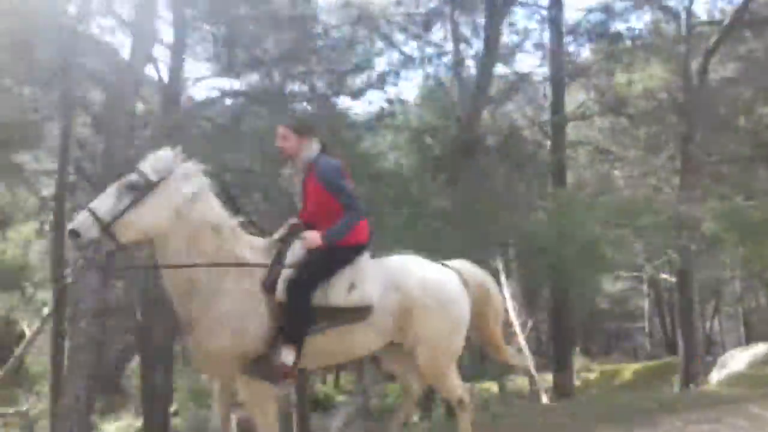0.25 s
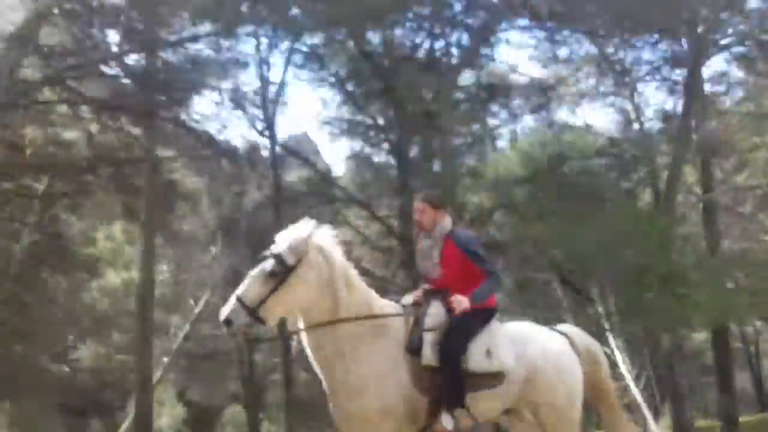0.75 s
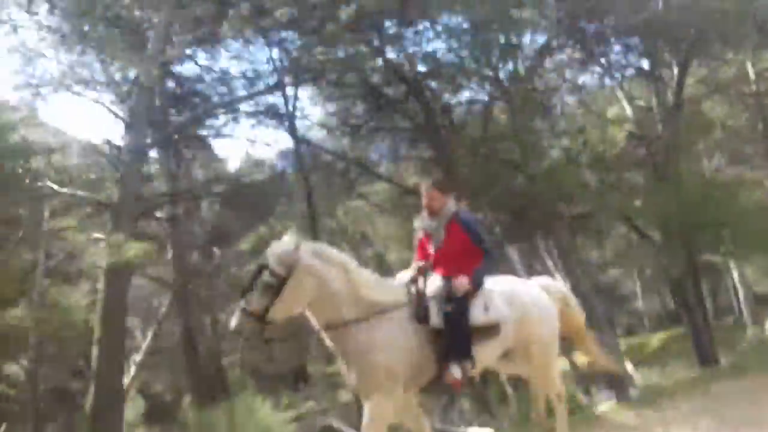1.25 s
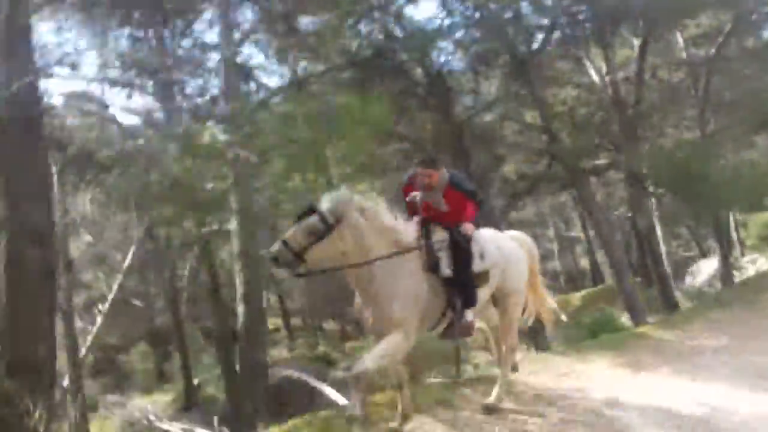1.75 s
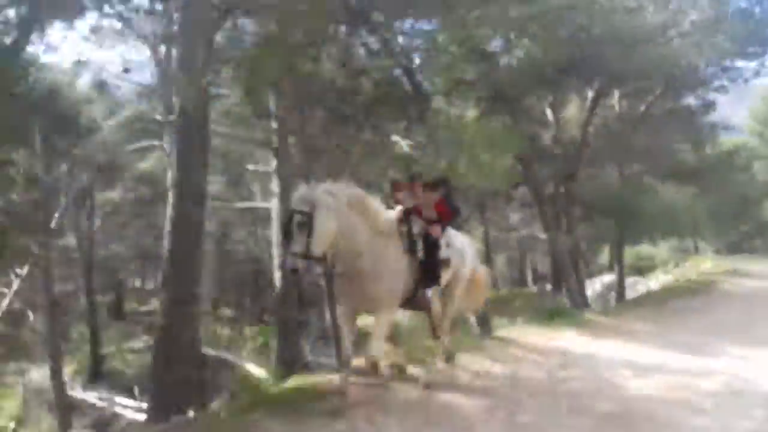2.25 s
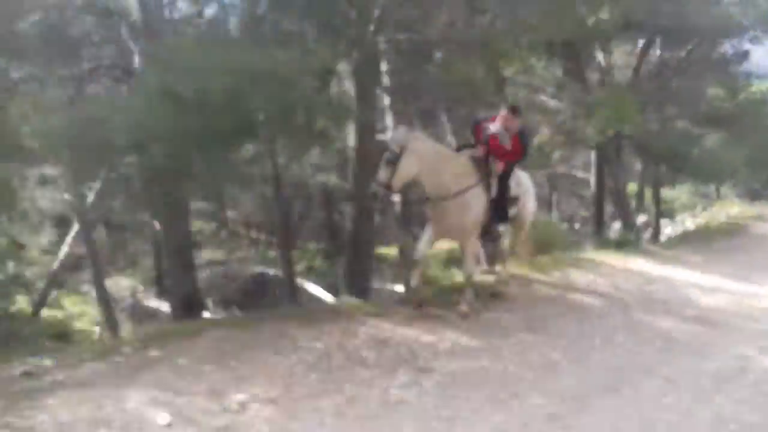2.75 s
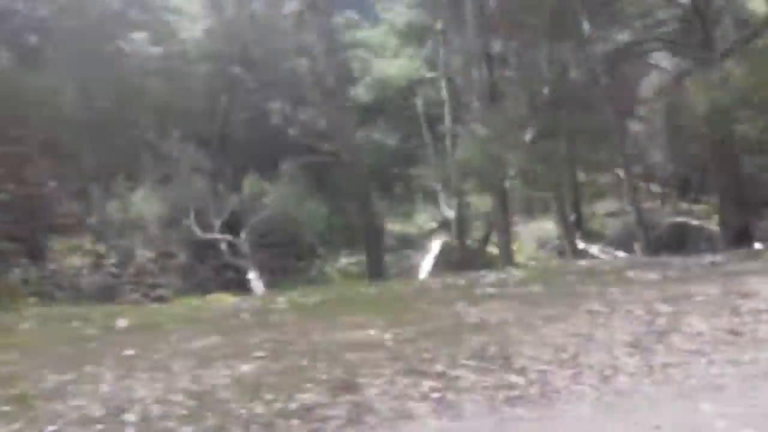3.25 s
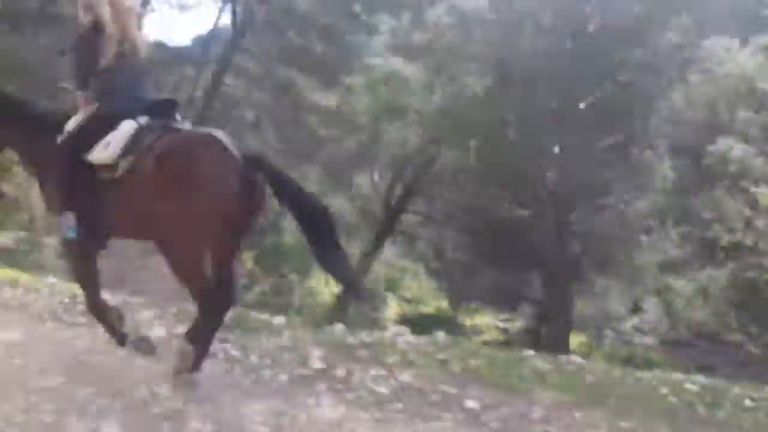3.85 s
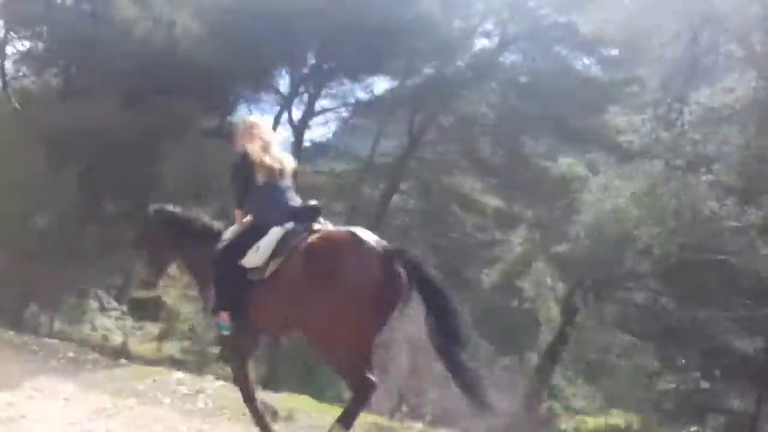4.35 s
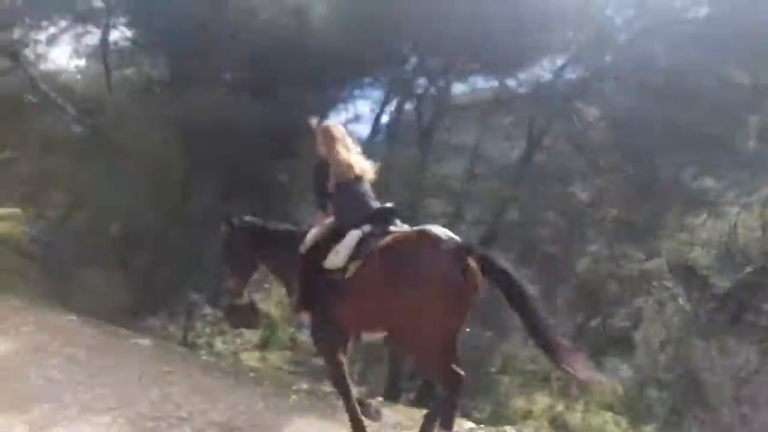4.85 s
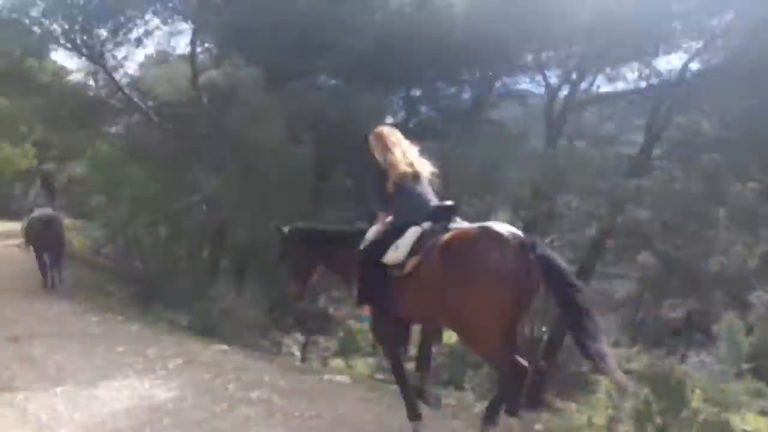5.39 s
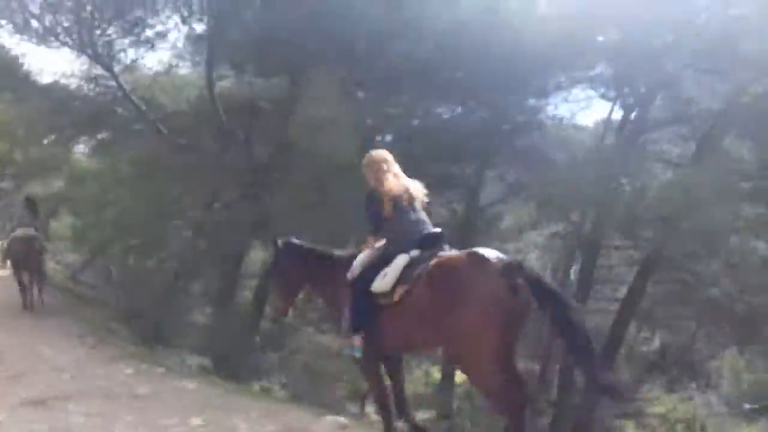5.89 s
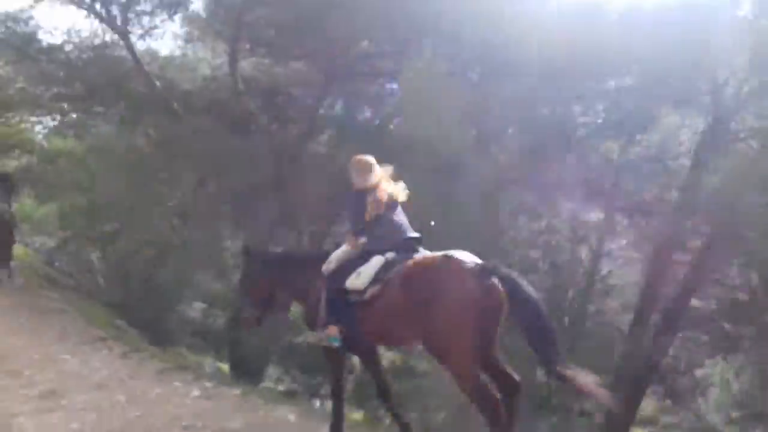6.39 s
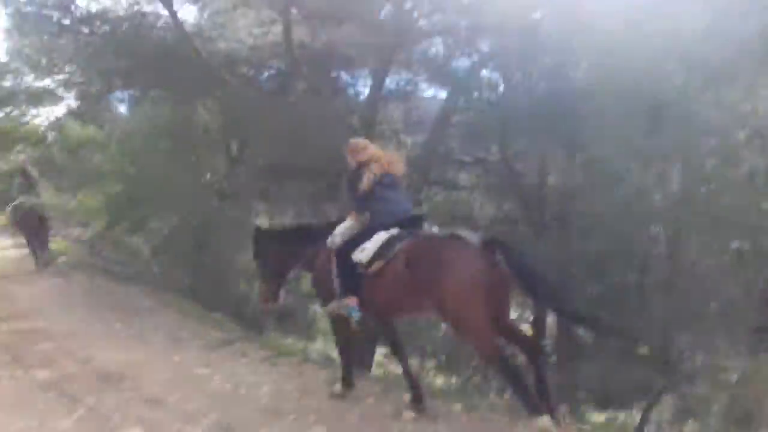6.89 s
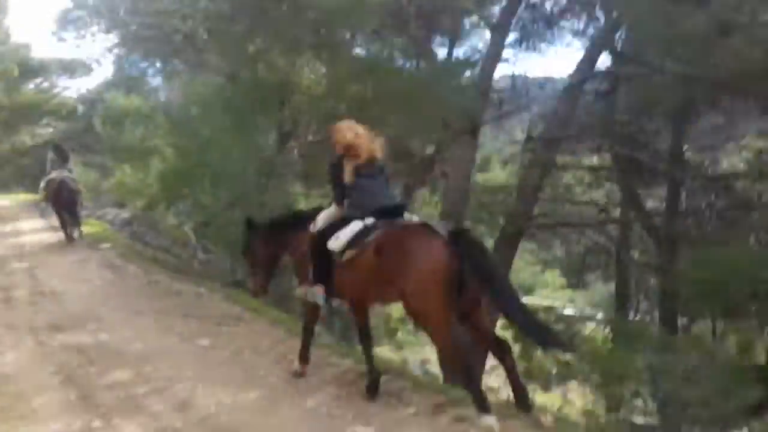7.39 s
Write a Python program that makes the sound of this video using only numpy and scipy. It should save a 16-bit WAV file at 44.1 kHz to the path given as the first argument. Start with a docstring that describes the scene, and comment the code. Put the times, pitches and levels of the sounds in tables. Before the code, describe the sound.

Loud, rough wind rumbles over a hand-held microphone as hooves strike stony ground nearby. The wind drops, revealing uneven dry knocks, skids and spraying grit, then surges once more for under half a second. The rest is mostly clopping hooves, sharp stone cracks and shifting gravel with light puffs of air, in an open forest with barely audible echoes.

```python
"""Horses on a stony trail

Several horses canter on a packed dirt trail among trees, close to a hand-held microphone.
Each hoof knock is a sharp blow and a crush of grit that ring ground, hoof and stone.
Gravel is a crowd of tiny ringing clicks over a hiss of sand; loose stones tap faintly at random moments.
Gusts, hardest at the start and in the middle, sweep random eddies over the microphone.
Faint echoes from ground and trunks and a steady background noise lie behind."""
import sys
import numpy as np
from scipy import signal
from scipy.fft import rfft, irfft
from scipy.io import wavfile
from scipy.ndimage import map_coordinates

SR = 44100
rng = np.random.default_rng(int(sys.argv[2]) if len(sys.argv) > 2 else 0)


def bounce(signal):
    """Save signal as a 16-bit WAV file at the path given by the first command-line argument."""
    frames = np.transpose(np.atleast_2d(signal))
    limited = np.clip(frames, -1, 1)
    pcm = np.round(limited * 32767).astype(np.int16)
    wavfile.write(sys.argv[1], SR, pcm)


N = 336519  # length in samples

# Knocks of hooves and of the stones they kick, close to the microphone:
# (time [s], hollow of the hoof [Hz], hollow level [dB], hoof wall level [dB],
#  stone crack level [dB], grit tick level [dB], crush of grit [factor on the first bite])
HOOF_KNOCKS = [(0.0286, 890, -17, -20, -20.5, -24, 0.67), (0.074, 920, -15, -37, -35, -37.5, .27),
               (0.1277, 920, -33, -38, -42, -35, .36), (0.2992, 866, -26, -41, -51, -44, .17),
               (0.379, 960, -32, -23.5, -42, -36.5, .66), (0.448, 1020, -29, -18.5, -46, -58, 0.63),
               (0.475, 980, -27, -38, -39, -29.5, .2), (0.6114, 856, -37, -35, -33.5, -46, 1.9),
               (0.6646, 1130, -25, -28.5, -42, -53, 1), (0.8227, 860, -25, -30, -43, -39, 0.32),
               (0.9199, 745, -23, -20.5, -41, -33.5, .3), (1.1861, 795, -40, -43, -28, -50, .67),
               (1.2721, 750, -15.5, -29, -34, -40, 0.59), (1.3766, 762, -35, -30, -48.5, -40, .66),
               (1.5453, 805, -27, -27, -40, -50.5, .5), (1.7097, 840, -34, -28, -39.5, -40.5, 3.1),
               (1.745, 865, -32, -41, -38, -42.5, 1.1), (1.812, 1021, -14.5, -21, -40, -36.5, 1.3),
               (1.8769, 860, -46, -46, -40, -45, 2), (1.961, 1150, -20, -33, -55, -54, 0.34),
               (2.0381, 1282, -24, -34.5, -52, -69, 1.09), (2.134, 1440, -25, -31.5, -54, -53, 1.3),
               (2.176, 1100, -19.5, -24, -35.5, -31.5, 0.6), (2.2661, 1118, -17.5, -19.5, -37, -33, 0.85),
               (2.4251, 1350, -31, -36, -61, -61, 1.4), (2.4848, 1310, -28, -39, -45, -54, 1.38),
               (2.5824, 1170, -25, -30, -61, -52, .54), (2.629, 1027, -20, -33.5, -57, -47, 0.19),
               (2.724, 948, -28, -34, -39, -41, 1.15), (2.9052, 952, -31.5, -36.5, -56, -63, 0.45),
               (2.9505, 1080, -29, -38, -58, -62, 1.1), (3.0421, 1469, -21, -32, -47, -65, 1.1),
               (3.0796, 1270, -19.5, -19, -32, -33, 0.43), (3.1811, 862.6, -20, -22, -41, -35, 0.93),
               (3.5364, 848, -24, -22, -19, -33, 0.24), (3.641, 1076, -25, -25, -30.5, -36, .41),
               (3.7738, 1098, -33, -31.5, -28, -53, 0.98), (3.8623, 868, -29, -36, -57, -63, 1.9),
               (3.9664, 1479, -28, -39, -49, -70, 1.3), (3.9982, 1104, -12.5, -22.5, -22.5, -33.5, .73),
               (4.1083, 1138, -16.5, -19, -28, -40, 0.34), (4.2963, 740, -31, -38, -30, -45, 0.28),
               (4.417, 948, -24, -34, -38.5, -75, 0.37), (4.4462, 1040, -34, -33, -43, -57, 0.63),
               (4.4705, 1109, -28, -29.5, -27.5, -37, 0.41), (4.4828, 980, -21, -45, -33, -49, 1.2),
               (4.5248, 1057, -22.5, -28, -35.5, -50, 0.15), (4.5813, 850, -26, -23.5, -31.5, -31.5, 1.9),
               (4.732, 1434, -58, -32.5, -35.5, -58, 0.79), (4.8239, 1310, -36, -31, -28.5, -48, 0.67),
               (4.9041, 1038, -22, -29, -39, -54, 1.3), (4.946, 1020, -32, -27, -27, -37, .6),
               (5.053, 647.6, -19, -25, -33, -37, 1.25), (5.086, 1029, -31, -44, -61, -68, .67),
               (5.2, 1170, -37.5, -36, -34.5, -58, 0.86), (5.404, 965.6, -17, -28, -23.5, -34, 0.34),
               (5.5192, 990, -18.5, -33, -24, -31, 0.24), (5.6168, 1274, -33, -29.5, -41, -52, 0.59),
               (5.7321, 1176, -26.5, -25, -40, -52, 0.57), (5.7591, 950, -37, -36, -38, -53, 2.2),
               (5.88, 1130, -15.5, -18, -18.5, -37, 0.36), (5.9942, 1080, -17.5, -25, -26, -36.5, 1.05),
               (6.3749, 950, -20, -38, -31, -38, 0.5), (6.4336, 1102, -29.5, -43, -35.5, -69, 0.51),
               (6.48, 930, -15, -26, -26.5, -35.5, .2), (6.5017, 1060, -24, -52, -51, -61, 1.5),
               (6.8128, 1312, -26.5, -35, -50, -64, 1.22), (6.8495, 1239, -30, -32, -32.5, -41, 1),
               (6.8694, 1322, -33, -38, -36, -66, 2.2), (6.9734, 782, -20, -28, -35, -44, 0.3),
               (7.3288, 1168, -28, -30, -40, -54, 0.75), (7.3446, 1063, -27, -29, -35, -43, 1.72),
               (7.3507, 843, -27.5, -33, -31, -38, 0.22), (7.3895, 1360, -20.5, -28, -20.5, -60, 0.37),
               (7.4763, 1328, -24.5, -35, -36, -46, 0.74)]


def hooves():
    """All the knocks, each at its moment."""
    out = np.zeros(N)
    for row in HOOF_KNOCKS:
        add(out, *knock(row))
    return out


# the ground thuds harder under a heavier blow
MIDDLING_BLOW_DB, THUD_DB, THUD_FOLLOWS_HOOF = -25, -36, 0.35
WALL_HZ = 2090  # every hoof has the same wall


def knock(row, bite_s=0.0015, crumble_s=0.010, crumble=0.009):
    """A blow and a brief crush of grit ring the ground, the hoof and the stone under it."""
    s, hollow_hz, hollow_db, wall_db, crack_db, tick_db, crush = row
    heavier_db = max(hollow_db, wall_db) - MIDDLING_BLOW_DB
    thud_db = THUD_DB + THUD_FOLLOWS_HOOF * heavier_db

    t = np.arange(SR // 10) / SR
    contacts = rng.standard_normal(len(t)) * rng.exponential(1, len(t))
    bite = contacts * t * np.exp(-t / bite_s)
    # the hoof bites into the grit, which goes on crumbling under the weight
    crumbling = crumble * unit(contacts) * np.exp(-t / crumble_s)
    force = crush * bite / np.linalg.norm(bite) + crumbling
    force[0] = 1  # the blow itself

    thud = ring(butter(force, 970, "lowpass", order=2), 480, 940)
    hollow = -ring(butter(force, [550, 1900], "bandpass", order=2), hollow_hz, 212)
    wall = ring(butter(force, [1400, 3000], "bandpass", order=2), WALL_HZ, 640)
    crack = -ring(butter(force, [2800, 4900], "bandpass", order=2), 4040, 910)
    tick = colour(force, [(3000, -24.0), (5000, 7.5), (6200, 6), (8500, -6.5),
                          (12000, -23.0), (16000, -27.5)])
    parts = [(thud_db, thud), (hollow_db, hollow), (wall_db, wall), (crack_db, crack), (tick_db, tick)]
    mixed = sum(amp(db) * x / np.linalg.norm(x) for db, x in parts)
    return s, mixed * np.sqrt(SR / 100)  # each level is the rms over a hundredth of a second


# loose stones that tap faintly at random moments
TAPS_PER_S, TAP_HZ = 4, (800, 1470)
TAP_HOOF_DB, TAP_STONE_DB, TAP_SPREAD_DB = -45, -56, 4.5


def taps(tick_below_db=10):
    """Loose stones knock faintly at random moments, each a weak blow of random pitch."""
    out = np.zeros(N)
    for when, pitch, size, hardness in rng.random((round(TAPS_PER_S * N / SR), 4)):
        hz = TAP_HZ[0] + pitch * (TAP_HZ[1] - TAP_HZ[0])
        hoof_db = TAP_HOOF_DB + TAP_SPREAD_DB * (2 * size - 1)
        stone_db = TAP_STONE_DB + TAP_SPREAD_DB * (2 * hardness - 1)
        tick_db = stone_db - tick_below_db
        add(out, *knock((when * N / SR, hz, hoof_db, hoof_db, stone_db, tick_db, 1)))
    return out


# Gravel shifting under the horses: (time [s], level [dB])
GRAVEL_TRAMPLE = [(0, -41.5), (1.1, -42.5), (1.8, -38), (2.12, -43.5), (2.65, -42.5), (3.7, -43),
                  (4.3, -47.5), (4.7, -42), (5.6, -41.5), (6.08, -37.5), (6.2, -54.5), (6.36, -45),
                  (6.7, -45), (7.05, -41.5), (7.63, -48)]
# Hooves that skid and spray gravel: (time of the peak [s], length [s], level [dB])
HOOF_SKIDS = [(.08, 0.18, -32), (2.25, 0.27, -37.5), (2.78, 0.12, -33.5), (3.1, 0.076, -33.5),
              (3.24, 0.076, -28), (3.8, 0.088, -33.5), (4.02, 0.035, -44), (4.145, 0.098, -38),
              (4.65, 0.093, -39.5), (4.935, 0.14, -31.5), (5.08, 0.14, -37.5), (5.38, 0.11, -37.5),
              (5.6, 0.091, -31), (5.88, 0.2, -38), (6.28, 0.084, -36), (6.44, 0.2, -36),
              (6.88, 0.23, -38.5), (7.02, 0.061, -34.5), (7.4, 0.26, -38), (7.54, 0.13, -32)]
# Tone of the gravel's rustle: (frequency [Hz], relative level [dB])
GRAVEL_COLOUR = [(200, -27), (450, -1), (800, -3), (1250, 1), (2050, -1), (2900, -13), (3950, -9.5),
                 (4600, -10.5), (5400, -28), (7000, -22), (9000, -35.5), (15500, -41.5)]
# fine grit flies with the gravel, more so in a hard skid: its level at a middling scuff
SCUFF_DB, SPRAY_DB, SPRAY_FOLLOWS_SCUFF = -44.5, -67.5, 1.2


def gravel(steps, sand=1.5, patter_db=4.5, spray_sand=0.73, kicked_db=-15, thrown_db=-12, settle_s=0.041):
    """Gravel grinds under the hooves over a hiss of sand; each hard knock throws up more grit."""
    scuff = np.hypot(amp(curves(GRAVEL_TRAMPLE)[0]), swells(HOOF_SKIDS))
    spray = amp(SPRAY_DB) * (scuff / amp(SCUFF_DB)) ** SPRAY_FOLLOWS_SCUFF
    patter = amp(patter_db * wander(36))

    coarse = pebbles(698, 4400, per_s=1500, spread_db=5.0, damping=0.15)
    coarse = coarse + sand * rng.standard_normal(N)
    coarse = butter(colour(coarse, GRAVEL_COLOUR), 6100, "lowpass", order=4)

    fine = pebbles(4500, 9800, per_s=2000, spread_db=8.0, damping=0.1)
    fine = fine + spray_sand * rng.standard_normal(N)
    fine = colour(fine, [(2500, -20.0), (4500, 0.5), (5600, 1.5), (7000, -2.0),
                         (9000, -14.5), (12000, -17.5), (15500, -12.0)])

    # the treble of each knock stirs up stones and grit
    kicked = amp(kicked_db) * settling(butter(steps, 1500, "highpass", order=2), settle_s)
    thrown = amp(thrown_db) * settling(butter(steps, 5300, "highpass", order=6), settle_s)
    grinding = np.hypot(scuff, kicked) * unit(coarse * patter)
    flying = np.hypot(spray, thrown) * unit(fine * patter)
    return grinding + flying


def pebbles(low_hz, high_hz, per_s, spread_db, damping):
    """Sparse clicks of small stones, each size ringing at its own pitch."""
    pitches = np.geomspace(low_hz, high_hz, num=12)
    out = np.zeros(N)
    for hz in pitches:
        size = amp(spread_db * np.minimum(rng.exponential(1, N), 4))
        struck = rng.random(N) < per_s / len(pitches) / SR
        clicks = size * rng.choice([-1, 1], N) * struck
        out += ring(clicks, hz, hz * damping)
    return unit(out)


def settling(x, seconds):
    """Loudness of x, dying away slowly, as stirred-up stones come to rest."""
    r = np.exp(-1 / (seconds * SR))
    return np.sqrt(signal.lfilter([1 - r], [1, -r], x ** 2))


# Underlying wind at the microphone; faster air sweeps the eddies past sooner:
# (time [s], level [dB], eddy rate before puffs and swings [1/s])
WIND_GUSTS = [(0, -18, 846), (.07, -14.5, 800.6), (.22, -13, 569.5), (.43, -15.5, 799), (.53, -17.5, 601),
              (.66, -15.5, 587.6), (.76, -19, 470.4), (.87, -16, 628), (.95, -22, 662.5),
              (1.08, -14, 589.4), (1.25, -15, 700.5), (1.77, -14, 621.2), (1.82, -24, 478.5),
              (2.05, -24, 297.7), (2.12, -39.5, 250.3), (3.21, -33.5, 259), (3.35, -10.5, 752),
              (3.61, -13.5, 690), (3.72, -25, 359.2), (3.84, -23, 319.8), (3.92, -32.5, 269.9),
              (4.62, -36.5, 250.4), (5.2, -34, 229.7), (5.86, -36, 209.9), (7.63, -35.5, 230)]
# Short puffs on top of it: (time of the peak [s], length [s], level [dB])
WIND_PUFFS = [(.99, .04, -14), (1.865, .04, -17), (2.25, 0.04892, -29), (2.345, .05, -20), (2.48, .07, -31),
              (2.765, .07, -19.5), (2.95, 0.0694, -27.5), (3.17, .04, -14.5), (4.19, 0.1034, -28.5),
              (4.275, .1, -22.5), (4.385, 0.0388, -23.5), (4.47, 0.1017, -28.5), (4.85, 0.09, -32),
              (5.11, .1, -29.5), (5.37, .08, -28), (5.53, .12, -27.5), (5.68, .14, -30), (5.93, .04, -30),
              (6.12, .09, -31.5), (6.43, 0.097, -30), (6.57, .14, -30.5), (7.075, 0.067, -21),
              (7.24, .18, -31)]
# a puff speeds the eddies up, the more the stronger it is: eddies per second added at PUFF_DB
PUFF_DB, PUFF_ADDS_HZ, PUFF_POWER = -20, 89.4, 1.2


def wind(flutter_db=2.13, flutter_share=0.27, speed_swing=0.24, lull_db=1.8, lull_hz=70, slope=2.53,
         port_hz=1900):
    """Eddies are swept over the microphone: faster air is brighter, and gusts and puffs set the level."""
    level_db, gust_hz = curves(WIND_GUSTS)
    gusts, puffs = amp(level_db), swells(WIND_PUFFS)
    eddy_hz = gust_hz + PUFF_ADDS_HZ * (puffs / amp(PUFF_DB)) ** PUFF_POWER
    # larger eddies speed up and slow down the small ones that they carry
    flutter = eddies(np.cumsum(eddy_hz * flutter_share) / SR, 2.88)
    pressure = eddies(np.cumsum(eddy_hz * np.exp(speed_swing * flutter)) / SR, slope)
    # a light breeze is uneven, a strong one blows more evenly
    uneven_db = lull_db * wander(lull_hz) * np.minimum(250 / eddy_hz, 1)
    pressure = pressure * amp(flutter_db * flutter + uneven_db)
    # the microphone passes neither the deepest rumble nor the finest eddies
    pressure = butter(pressure, 99, "highpass", order=2)
    pressure = butter(pressure, 150, "highpass", order=1)
    pressure = colour(pressure, [(port_hz, 0), (3500, 1.5), (4500, -6), (5600, -16), (8000, -22)])
    return np.hypot(gusts, puffs) * unit(pressure)


def eddies(travelled, slope):
    """Pressure in a frozen random pattern, read after so many eddies have passed; small ones carry less."""
    size, per_eddy = 2 ** 18, 32  # points in the pattern, points per eddy
    wavenumber = np.fft.rfftfreq(size) * per_eddy
    pattern = irfft(rfft(rng.standard_normal(size)) / np.sqrt(1 + wavenumber ** (2 * slope)))
    return map_coordinates(unit(pattern), [travelled * per_eddy % size], order=3, mode="wrap")


def forest(x, t60=0.22, wet_db=-23):
    """Faint scattered echoes from the ground and the trunks, falling by 60 dB in t60 seconds."""
    t = np.arange(SR // 2) / SR
    sparse = rng.random(len(t)) < 0.05
    echoes = rng.standard_normal(len(t)) * sparse * (t > 0.004) * amp(-60 * t / t60)
    return amp(wet_db) * signal.oaconvolve(x, echoes / np.linalg.norm(echoes))[:N]


# Tone of the steady forest and microphone noise: (frequency [Hz], relative level [dB])
BACKGROUND_COLOUR = [(25, -16.5), (110, 5), (250, -2), (1200, -4), (2000, -9), (2900, -15.5), (4000, -14),
                     (6000, -45), (9000, -46.5), (16000, -45.5)]


def background(level_db=-48.0):
    """Steady noise of the forest and the microphone: coloured random noise."""
    return amp(level_db) * unit(colour(rng.standard_normal(N), BACKGROUND_COLOUR))


def amp(db):
    """Decibels to gain."""
    return 10 ** (np.asarray(db) / 20)


def unit(x):
    """Scales to rms 1."""
    return x / np.sqrt(np.mean(x ** 2) + 1e-20)


def curves(rows):
    """Each column of a table, joined by straight lines in time."""
    s, *columns = np.transpose(rows)
    return [np.interp(np.arange(N) / SR, s, c) for c in columns]


def swells(rows):
    """Gain of short swells, each rising to its peak and falling again."""
    t = np.arange(N) / SR
    power = np.zeros(N)
    for s, length, db in rows:
        near = abs(t - s) < 2 * length
        power[near] += amp(db) ** 2 / np.cosh(4 * (t[near] - s) / length) ** 2
    return np.sqrt(power)


def wander(rate_hz):
    """Random drift of rms 1, its spectrum fading out around the rate."""
    hz = np.fft.rfftfreq(N, 1 / SR)
    return unit(irfft(rfft(rng.standard_normal(N)) * np.exp(-(hz / rate_hz) ** 2), N))


def colour(x, points):
    """Causal minimum-phase filter with the given (frequency [Hz], level [dB]) response."""
    hz, db = np.transpose(points)
    size = 4096
    grid_hz = abs(np.fft.fftfreq(size, 1 / SR)) + 1  # the 1 avoids log of zero
    log_gain = np.log(amp(np.interp(np.log(grid_hz), np.log(hz), db)))
    response = np.exp(np.conj(signal.hilbert(log_gain)))
    impulse = np.fft.ifft(response).real[:size // 2]
    return signal.oaconvolve(x, impulse)[:len(x)]


def butter(x, hz, kind, order):
    """Causal low-pass, high-pass or band-pass."""
    sos = signal.butter(order, np.minimum(hz, SR / 2 - 10), kind, fs=SR, output="sos")
    return signal.sosfilt(sos, x)


def ring(x, hz, width_hz):
    """A damped mode: the wider its resonance, the sooner it dies away."""
    return signal.lfilter(*signal.iirpeak(hz, hz / width_hz, fs=SR), x)


def add(mix, s, sound):
    """Mixes a sound in at a time in seconds."""
    part = mix[max(round(s * SR), 0):][:len(sound)]
    part += sound[:len(part)]


def scene():
    """Hooves and gravel among the trees, with wind on the microphone."""
    steps = hooves() + taps()
    return (steps + gravel(steps) + wind() + forest(steps) + background())[None]


# Colour of the hand-held microphone: (frequency [Hz], level [dB])
MICROPHONE_COLOUR = [(30, 3), (2000, -2), (2900, -2), (3900, -1), (4600, -6), (5600, -8.5), (7000, -13),
                     (8800, -8.5), (10100, -17), (11200, -1.5), (14300, -9), (15500, -5.5)]
EDGE_HZ = 16000  # upper band limit


def record(dry, ceiling=1.0):
    """Peaks are rounded off; then come the microphone's colour and the band limit."""
    x = dry[0] / (1 + (dry[0] / ceiling) ** 8) ** (1 / 8)
    x = colour(x, MICROPHONE_COLOUR)
    band_limit = signal.firwin(401, EDGE_HZ, window=("kaiser", 9), fs=SR)
    return signal.oaconvolve(x, band_limit, "same")[None]


dry = scene()
out = record(dry)
bounce(out)
```